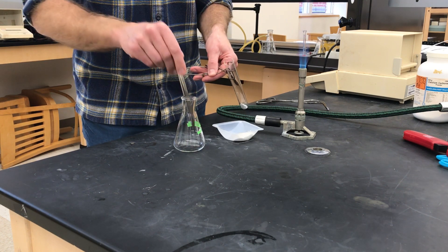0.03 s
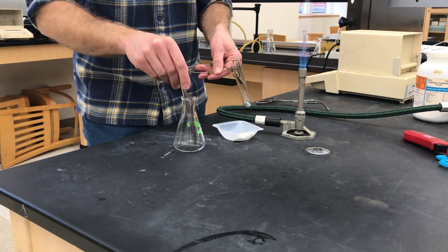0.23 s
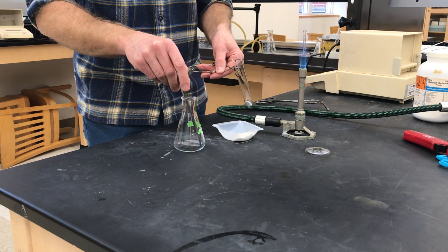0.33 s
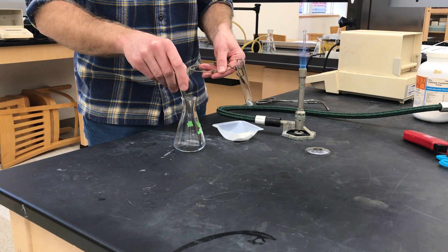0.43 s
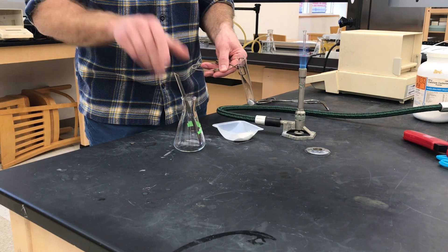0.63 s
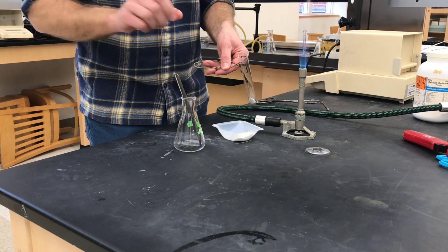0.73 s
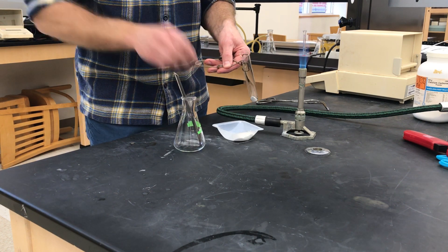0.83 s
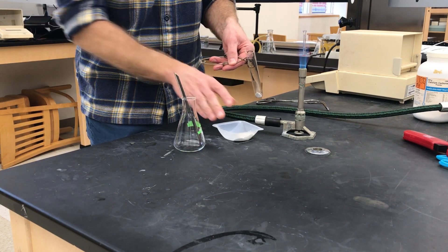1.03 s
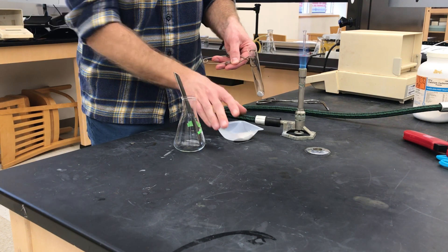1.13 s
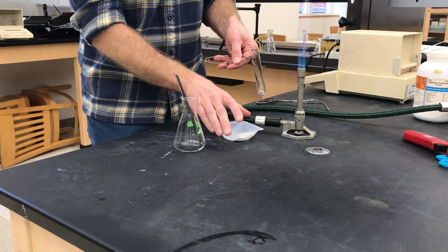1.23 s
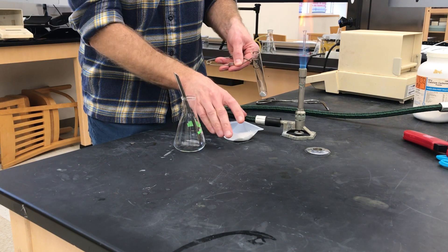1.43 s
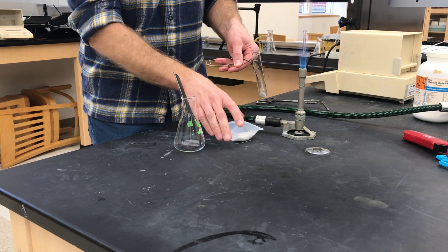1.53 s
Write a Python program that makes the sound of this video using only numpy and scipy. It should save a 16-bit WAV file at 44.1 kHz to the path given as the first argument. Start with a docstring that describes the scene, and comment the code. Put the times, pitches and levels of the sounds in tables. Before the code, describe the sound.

A rod clinks into a glass flask. It ticks lightly on the neck at 0.1 seconds, scrapes briefly, then lands with a quick cluster of bright, high ringing clinks from 0.2 to 0.4 seconds, dying away by about 0.6. At 1.3 seconds a hand bumps a plastic dish with a faint, dull clatter. The small hard room adds a short echo, and low ventilation hums faintly throughout.

```python
"""Rod dropped into a glass flask

A rod is let down into a flask on a lab bench: it ticks at the neck, scrapes down the wall, bounces on
the bottom and rattles to rest, each contact ringing the glass. A second later a hand bumps a plastic
dish with quick thuds and snaps. A small hard room answers both, and ventilation hums underneath."""
import sys
import numpy as np
from scipy import signal
from scipy.fft import rfft, irfft
from scipy.io import wavfile

SR = 44100
rng = np.random.default_rng(int(sys.argv[2]) if len(sys.argv) > 2 else 0)


def to_wav(s):
    """Save 16-bit WAV."""
    ch = np.atleast_2d(s).T  # columns
    pcm = np.round(np.clip(ch, -1, 1) * 32767)  # PCM
    wavfile.write(sys.argv[1], SR, pcm.astype(np.int16))


N = 70560

# The rod's hits. Each row: start in seconds, place on the flask, ring gain in dB,
# brightness in dB per octave, ring length as a factor, knock gain in dB.
ROD_HITS = [(0.001, "neck", -35, -15.5, 1.44, -40), (0.0923, "neck", -15, 6, 1.5, -18.5),
            (0.2233, "base", 1, 0.5, 0.9, 1.5), (0.2638, "heel", 2.5, 0.5, 0.7, -1.5),
            (0.2798, "neck", 1, -2.5, 0.8, -9.5), (0.2805, "heel", -4.5, 6.5, 1.22, -17),
            (0.2955, "heel", -7.5, -4.5, 0.78, -7.5), (0.3044, "heel", -7, -7, 0.57, -9),
            (0.3425, "neck", -21, 21, 0.67, -16), (0.361, "base", -23, 1, 0.94, -23)]
# The hollow body of the flask's air and the rod. Each row: pitch in Hz, t60 in seconds, relative dB.
HOLLOW_MODES = [(436.4, 0.16, -48), (788.5, .14, -47), (954, .11, -54), (999, .11, -48.5),
                (2458, .06, -47.5)]
HIT_RISE_S = 0.00037

def rod_clinks():
    """Each hit of the rod knocks the flask and rings the glass according to where it lands."""
    out, t = np.zeros(N), np.arange(SR // 2) / SR
    attack = 1 - np.exp(-t / HIT_RISE_S)
    for start, place, ring_db, brightness, length, knock_db in ROD_HITS:
        chime = amp(ring_db) * glass_ring(t, place, brightness, length)
        body = amp(knock_db) * (knock(t) + ring(t, HOLLOW_MODES))
        add(out, start, (chime + body) * attack)
    return out


# The voice of the glass. Each entry: pitch in Hz, then t60 in seconds before the length factor
# and relative level in dB when struck at the base, at the heel, at the neck.
GLASS_MODES = {3281: (.25, -62, -49.5, -70), 4075: (0.17, -55, -53.5, -47.5),
               4112: (0.13, -43, -43.5, -31.5), 4581: (.2, -67.5, -65, -71), 5437: (.12, -63, -54, -73.5),
               5625: (0.2227, -34.5, -32.5, -56), 5735: (0.17, -49, -43, -68),
               6040: (0.07, -72, -47.5, -87.5), 6628: (0.0961, -62, -48.5, -75.5),
               6840: (.15, -59.5, -51, -68), 6995: (0.16, -35.5, -41, -64.5), 7375: (.11, -77, -46.5, -72),
               7483: (.12, -45, -52, -72.5), 7805: (.15, -48, -41.5, -64), 8440: (.1, -41, -54.5, -59.5),
               8505: (0.06, -47.5, -53, -37), 8842: (.08, -49, -64, -66), 9235: (0.12, -36, -41.5, -66),
               9285: (.07, -53.5, -50, -72.5), 9743: (.13, -56.5, -50, -71),
               10580: (.13, -81.5, -56.5, -77.5), 11150: (0.15, -45.5, -64, -61.5),
               11330: (.09, -44.5, -53.5, -52.5), 11470: (.08, -51, -56, -71), 11845: (.1, -51, -50.5, -67),
               12556: (.08, -44.5, -42.5, -72), 12710: (.08, -60, -69, -76), 13200: (.07, -42, -51.5, -76),
               13520: (.07, -64, -55.5, -72), 14236: (.12, -58.5, -49, -73), 14630: (.11, -43, -67, -80),
               15080: (.05, -46, -57, -78)}
BRIGHT_PIVOT_HZ = 6000

def glass_ring(t, place, brightness, length):
    """The place struck balances the modes; each hit's own brightness tilts them to treble or bass."""
    hz = np.array(list(GLASS_MODES))
    t60, base_db, heel_db, neck_db = np.transpose(list(GLASS_MODES.values()))
    place_db = {"base": base_db, "heel": heel_db, "neck": neck_db}[place]
    tilt_db = brightness * np.log2(hz / BRIGHT_PIVOT_HZ)
    return ring(t, np.column_stack([hz, t60 * length, place_db + tilt_db]))


# The colour of the knock. Each row: frequency in Hz, relative level in dB.
KNOCK_SPECTRUM = [(100, -14), (250, -4.5), (450, -4), (950, 2), (1500, -5), (2500, -6.5), (3500, -8),
                  (4800, -13.5), (5500, -3.5), (6350, -22), (7200, -11), (9300, -17), (10500, -14),
                  (11400, -4), (14000, -19.5), (16000, -23.5)]

def knock(t):
    """The rod's toneless knock through the flask into the bench: a crack and a short clatter."""
    crack = amp(-39.5) * fade(t, t60=0.0073)
    clatter = amp(-37.5) * fade(t, t60=0.089)
    return noise(KNOCK_SPECTRUM, len(t)) * (crack + clatter)


SCRAPE_START_S, SLIPS_PER_S = 0.162, 640

def rod_scrape():
    """The rod scrapes down the flask's wall in tiny dying slips, faintly ringing the glass body."""
    out, t = np.zeros(N), np.arange(SR // 2) / SR
    slipping = rng.random(len(t)) < SLIPS_PER_S / SR
    slips = slipping * rng.standard_normal(len(t)) * fade(t, t60=0.14)
    one_slip = amp(-44) * glass_ring(t, "base", brightness=2.5, length=1) + amp(-30) * knock(t)
    add(out, SCRAPE_START_S, signal.fftconvolve(slips, one_slip))
    return out


# Blows of hand and dish. Each row: start in seconds, thud level in dB, thud pitch in Hz,
# clatter level in dB, snap level in dB.
DISH_BLOWS = [(1.3087, -38, 744, -48, -42.5), (1.3181, -35.5, 408.5, -50, -47.5),
              (1.3255, -36.5, 186, -62.5, -74), (1.3306, -35, 300, -53, -68), (1.356, -43.5, 129, -67, -83)]
# The colours of the dull clatter and the sharp plastic snap. Each row: frequency in Hz, relative dB.
CLATTER_SPECTRUM = [(100, -18.5), (300, 7), (1100, -1), (1600, -12.5), (3700, -10.5), (5500, -26.5),
                    (7500, -42), (10000, -32), (12000, -27), (16000, -40)]
SNAP_SPECTRUM = [(200, 4.5), (1000, 9), (1800, -4.5), (5000, -4.5), (7500, -5.5), (9500, -12),
                 (12000, -14.5), (16000, -19)]
# The ring of bench and dish. Each row: pitch in Hz, t60 in seconds, level in dB.
BENCH_DISH_MODES = [(139.2, 0.83, -52), (193, 0.64, -57.5), (251.2, 0.73, -53.5), (424, 0.22, -56),
                    (583, 0.26, -63), (952, 0.095, -52), (1167, 0.17, -61.5), (2045, 0.18, -68),
                    (3680, 0.14, -66), (7610, .02, -59), (11940, 0.071, -63.5)]
BLOW_RISE_S = 0.00049

def dish_bump():
    """A hand bumps the dish in a few quick blows; the first sets bench and dish ringing."""
    out, t = np.zeros(N), np.arange(SR // 2) / SR
    attack = 1 - np.exp(-t / BLOW_RISE_S)
    for start, thud_db, hz, clatter_db, snap_db in DISH_BLOWS:
        thud = -amp(thud_db) * np.sin(2 * np.pi * hz * t) * fade(t, t60=0.025)
        clatter = amp(clatter_db) * noise(CLATTER_SPECTRUM, len(t)) * fade(t, t60=0.063)
        snap = amp(snap_db) * noise(SNAP_SPECTRUM, len(t)) * fade(t, t60=0.017)
        add(out, start, (thud + clatter + snap) * attack)
    add(out, DISH_BLOWS[0][0], ring(t, BENCH_DISH_MODES) * attack)
    return out


# The soft colour of the rubbing. Each row: frequency in Hz, relative level in dB.
RUB_SPECTRUM = [(200, 8), (500, -1.5), (950, 10.5), (1350, -8), (2400, -15), (5000, -21), (15000, -49)]
RUB_DB, RUB_HOLD_S, RUB_FADE_S = -68, 0.2, 0.08

def rod_rub():
    """Faint rubbing while the rod is lowered, fading as it is let go."""
    t = np.arange(N) / SR
    envelope = np.clip(1 - (t - RUB_HOLD_S) / RUB_FADE_S, 0, 1)
    return amp(RUB_DB) * noise(RUB_SPECTRUM, N) * envelope


# The decay of the small hard room. Each row: frequency in Hz, t60 in seconds.
ROOM_DECAY = [(100, .5), (500, .48), (2000, 0.46), (5000, 0.42), (9000, .38), (15000, 0.24)]
PREDELAY_S, BUILD_S = 0.004, 0.003

def room_tail():
    """A diffuse tail that builds quickly and dies sooner in the treble."""
    hz, t, bands = signal.stft(rng.standard_normal(SR), SR, nperseg=256)
    decay = fade(t, read(ROOM_DECAY, hz)[:, None])
    _, tail = signal.istft(bands * decay, SR, nperseg=256)
    tail *= np.clip((np.arange(len(tail)) / SR - PREDELAY_S) / BUILD_S, 0, 1)
    return tail / np.linalg.norm(tail)


ROOM_DB, FLUTTER_HZ = -8.5, 9

def room_reverb(direct, tails=3):
    """The sound feeds several tails in turn at constant total power, so the dying ring flutters."""
    turn = np.pi * FLUTTER_HZ * np.arange(N) / SR
    sends = [np.sqrt(2 / tails) * np.sin(turn + np.pi * k / tails) for k in range(tails)]
    return amp(ROOM_DB) * sum(signal.fftconvolve(direct * send, room_tail())[:N] for send in sends)


# The colour of the ventilation. Each row: frequency in Hz, relative level in dB.
VENT_SPECTRUM = [(20, -33), (35, -15.5), (55, 0.5), (85, -0.5), (160, -1.5), (300, -7.5), (420, -14),
                 (560, -23), (900, -25.5), (1400, -31.5), (3000, -36), (8000, -40.5), (15500, -42.5)]
VENT_DB = -61

def ventilation():
    """A steady bed of low, humming air noise."""
    return amp(VENT_DB) * noise(VENT_SPECTRUM, N)


def amp(db):
    """Decibels to gain."""
    return 10 ** (np.asarray(db) / 20)


def read(points, hz):
    """Reads a curve on a log-frequency axis."""
    f, value = np.transpose(points)
    return np.interp(np.log(hz + 1), np.log(f + 1), value)


def add(mix, start, sound):
    """Lays a sound into the mix at a start time in seconds."""
    part = mix[max(round(start * SR), 0):][:len(sound)]
    part += sound[:len(part)]


def fade(t, t60):
    """Exponential decay, 60 dB down after t60 seconds."""
    return np.exp(-np.log(1000) * t / t60)


def noise(spectrum, size):
    """Noise of unit level, coloured by the spectrum."""
    gain = amp(read(spectrum, np.fft.rfftfreq(size, 1 / SR)))
    coloured = irfft(rfft(rng.standard_normal(size)) * gain, size)
    return coloured / coloured.std()


def ring(t, modes):
    """Struck modes of random polarity, each dying at its own speed."""
    hz, t60, db = np.transpose(modes)
    polarity = rng.choice([-1, 1], len(hz))
    partials = fade(t, t60[:, None]) * np.sin(2 * np.pi * hz[:, None] * t)
    return (polarity * amp(db)) @ partials


def scene():
    """The bench sounds, their reverb and the ventilation, in mono."""
    direct = rod_clinks() + rod_scrape() + dish_bump() + rod_rub()
    return (direct + room_reverb(direct) + ventilation())[None]


LOW_CUT_HZ, HIGH_CUT_HZ = 45.6, 15850

def record(dry):
    """A low cut trims the rumble and a steep high cut takes off the very top."""
    low_cut = signal.butter(4, LOW_CUT_HZ, "highpass", fs=SR, output="sos")
    high_cut = signal.firwin(255, HIGH_CUT_HZ, window=("kaiser", 9), fs=SR)
    return signal.oaconvolve(signal.sosfilt(low_cut, dry), high_cut[None], "same")


dry = scene()
out = record(dry)
to_wav(out)
```